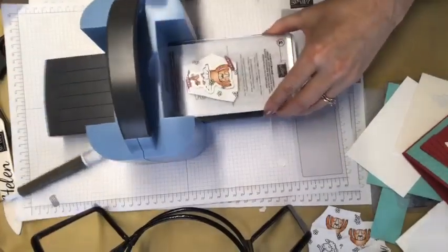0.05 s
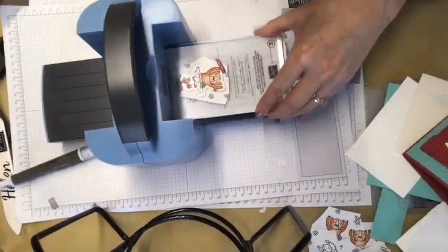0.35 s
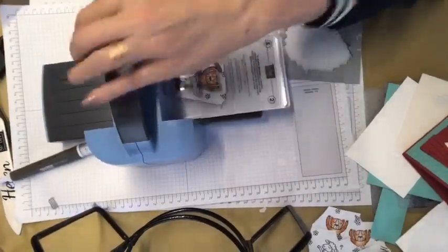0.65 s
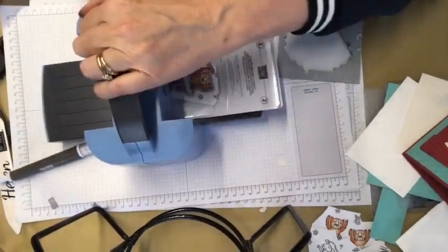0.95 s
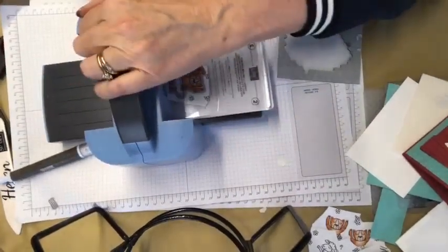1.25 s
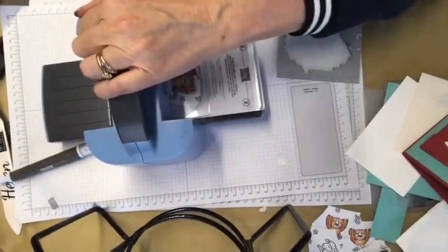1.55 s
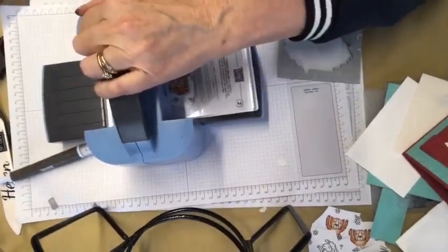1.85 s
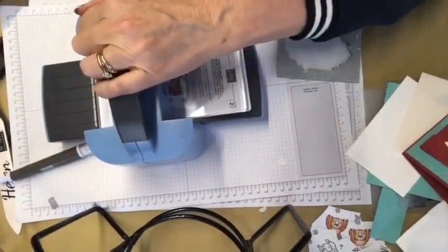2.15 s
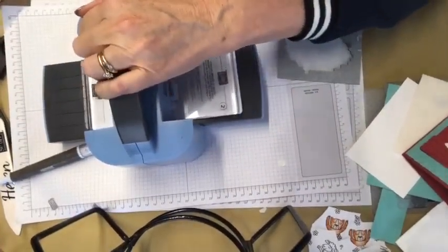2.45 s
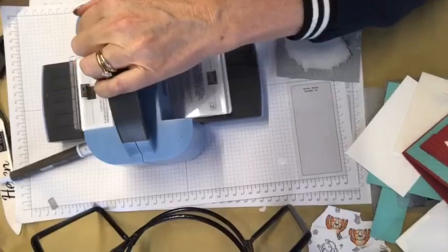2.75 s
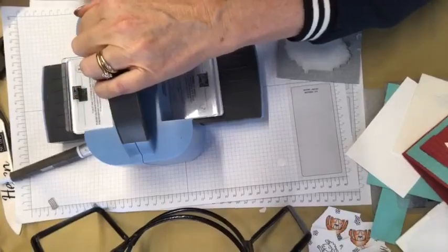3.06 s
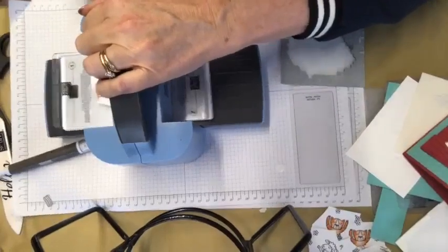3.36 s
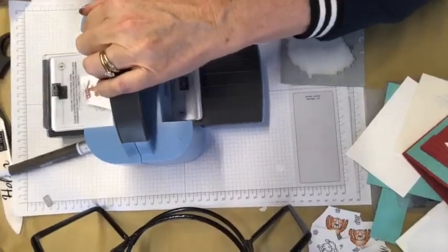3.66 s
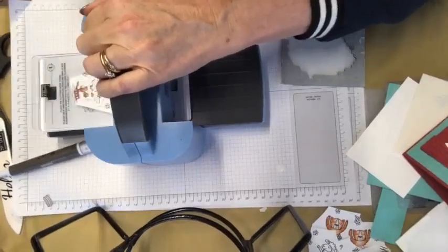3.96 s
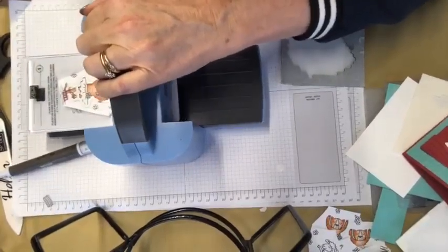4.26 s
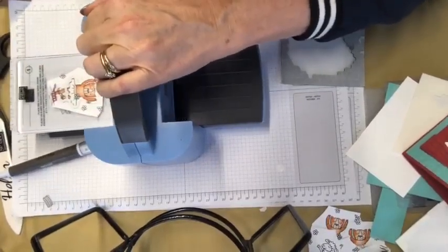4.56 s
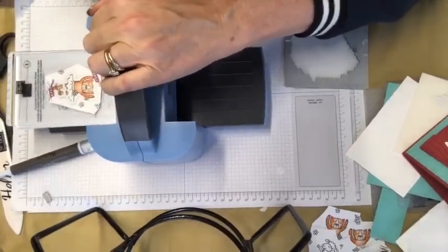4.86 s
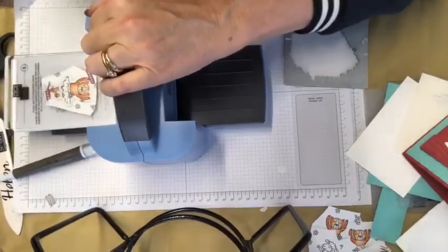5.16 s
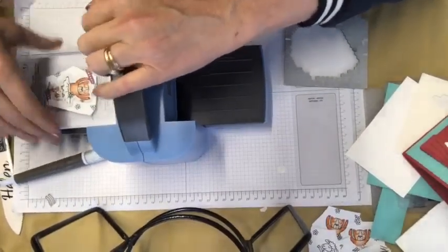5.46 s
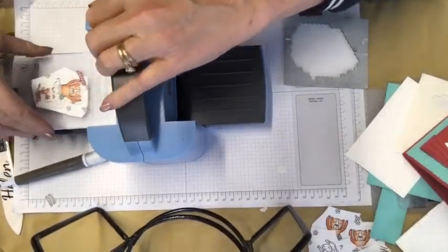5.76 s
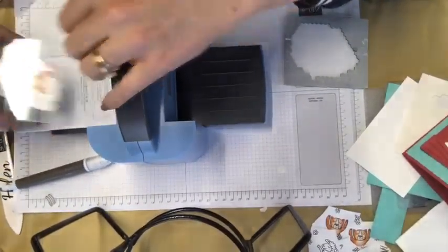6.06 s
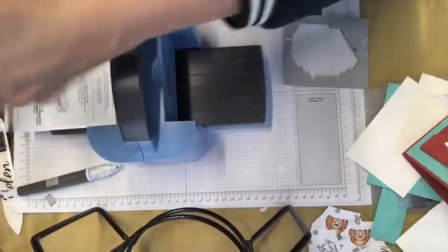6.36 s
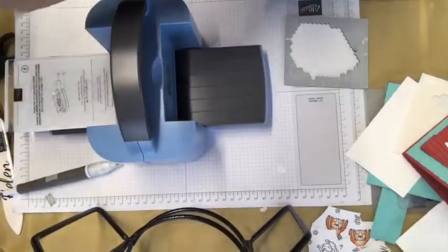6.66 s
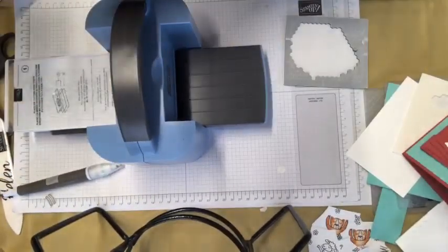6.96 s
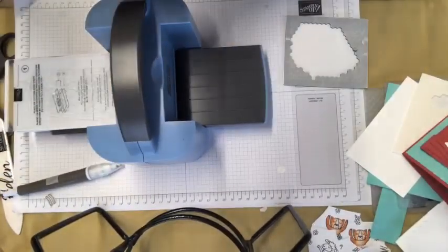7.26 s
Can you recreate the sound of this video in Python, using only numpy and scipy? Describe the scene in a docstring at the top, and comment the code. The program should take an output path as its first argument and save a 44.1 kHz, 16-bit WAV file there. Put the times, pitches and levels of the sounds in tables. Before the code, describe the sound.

A hand-cranked die-cutting machine grinds and ticks as plastic plates pass through its rollers, with a thump and a few sharp clacks.

```python
"""Acrylic plates crack and snap through the rollers of a hand-cranked die-cutting machine.
Pushed in, they crack under pressure and clatter free; the top plate lifts off with a clack.
Each contact is a noise crack plus ringing modes, and the heaviest make the craft table boom.
Play in the crank ticks; stick-slip in the rollers grinds and rumbles with the hand's effort.
Plates creak and hands brush over them, heard from close above in a small room."""
import sys
import numpy as np
from scipy import signal
from scipy.fft import rfft, irfft, next_fast_len
from scipy.io import wavfile

SR = 44100
rng = np.random.default_rng(int(sys.argv[2]) if len(sys.argv) > 2 else 0)


def generate_wav(signal):
    """Clip the signal to [-1, 1] and save it as 16-bit WAV at the path in sys.argv[1]."""
    frames = np.transpose(np.atleast_2d(signal))
    scaled = np.clip(frames, -1, 1) * 32767
    pcm = np.round(scaled).astype(np.int16)
    wavfile.write(sys.argv[1], SR, pcm)


N = 322150
TIME = np.arange(N) / SR
CONTACT_TIME = TIME[:SR // 7]

# start_s, level_db, weight_db, hardness_db, mode_hz, second_hz, mode_db, ring_ratio, attack_s, spread_db
PLATE_CLACKS = [(0.364, -48, -0.5, -8, 660, 1090, 5, 0.19, 0.00034, -15),
                (0.372, -57.5, -9, 7, 7330, 3750, -2, 0.21, 0.00071, -5),
                (0.376, -48, -15, -2, 1778, 2150, -3, 1.3, 0.0043, -3),
                (0.3965, -40.5, -25, -5, 1593, 1280, 13, 0.7, 0.0018, -5),
                (0.401, -53, -19.5, 4, 4700, 1297, 19, 1.6, 0.0015, -8),
                (0.44, -50.5, 8.5, -3, 350, 243, 8, 0.53, 0.0018, -2),
                (0.461, -53.5, 6, -8, 466, 690, -14, 1.3, 0.0017, -7),
                (0.48, -56.5, 6, -11, 1360, 1640, 15, 0.53, 0.00082, -6),
                (3.342, -31, -9.5, 4, 1267, 2090, 2, 0.29, 0.0043, -32),
                (3.346, -45, 3, -4.5, 648, 190, 5.5, 0.8, 0.0015, -29),
                (3.349, -46.5, -13, 4, 2670, 3180, 11.5, 1.9, 0.0017, -23),
                (3.388, -62, -4.5, -1.5, 1670, 1240, 4.5, 0.4, 0.001, -18.5),
                (3.403, -61.5, 16.5, 2, 630, 2550, 0, 0.51, 0.0014, -22),
                (5.0795, -32.5, -11.5, 0, 1490, 1050, 0.5, 0.38, 0.0027, -9.5),
                (5.083, -37, 4, -6, 642, 680, 18, 1.4, 0.0025, -6),
                (5.1005, -47, -10.5, 9, 4400, 3000, -5.5, 0.4, 0.0007, -7),
                (5.1015, -35.5, -26.5, -7.5, 1867, 1044, 19.5, 1.5, 0.0011, -5),
                (5.106, -45, -22, -1.5, 2870, 2330, 10, 0.66, .001, -4),
                (5.131, -46.5, 2, 3, 2015, 4020, 4, 0.62, 0.0031, -1),
                (5.138, -61, 12, -14, 1070, 450, 10, 0.47, 0.0017, -6),
                (5.165, -63, -19, 14, 5200, 2270, -16, 0.5, 0.0013, -16),
                (5.1698, -40, 2, 2.5, 504, 4500, 0, 0.41, 0.00035, -33),
                (5.177, -51.5, 14, -1, 643, 1050, 10, 0.37, 0.0018, -20),
                (5.211, -51, 2.5, 6, 4540, 3950, 8, 0.71, 0.0015, -34),
                (6.0054, -54, -10, 12.5, 5720, 3750, -5.5, 0.3, 0.00067, -44),
                (6.008, -46, -4, 4, 1460, 1130, 1, 0.38, 0.0016, -45),
                (6.014, -48, -3, 1, 315.4, 324, 30, 1.26, 0.0026, -41)]
CLACK_COLOUR_DB = [-7, 1.5, 1.5, -2.5, -13]   # per register


def plate_clacks(registers):
    """Plates knock on the bed and snap as an edge gives way. Returns the sound and its stereo send."""
    out, scattered = np.zeros((2, N))
    for start_s, db, weight_db, hardness_db, *favoured, ring_ratio, attack_s, spread_db in PLATE_CLACKS:
        levels_db = db + register_levels(CLACK_COLOUR_DB, weight_db, hardness_db)
        clack = contact(registers, levels_db, favoured, ring_ratio, attack_s,
                        mode_t60_s=0.042, crack_t60_s=0.072, crack_db=-0.5, uneven_db=6.5)
        add(out, start_s, clack)
        add(scattered, start_s, from_db(spread_db) * clack)
    return out, scattered


# housing and plates: pitch_hz, level_db, t60_s
BODY_MODES = [(199, -17, 0.1), (275, -15, 0.057), (507, -6.5, 0.041), (616.5, 11, 0.047), (914, -8, 0.051),
              (1040, -13, 0.013), (1280, -3, 0.059), (1670, 1, 0.036), (1533, 4.5, 0.037),
              (1780, -6.5, 0.068), (2140, -6.5, 0.083), (2465, -16, 0.097), (2670, -15.5, 0.081),
              (3463, -8, 0.029), (3850, -3.5, 0.029), (4260, 2, 0.018), (5300, -12, 0.0094),
              (6700, -10.5, 0.016)]
# hard plastic: freq_hz, density_db
CRACK_SPECTRUM = [(100, -4), (190, -4), (350, -21.5), (480, 7.5), (620, 8.5), (780, 3.5), (1300, 3),
                  (2100, -0.5), (3400, -6.5), (5200, -10.5), (7600, -12), (9500, -19), (12300, -16.5),
                  (15000, -30.5)]
REGISTER_EDGES_HZ = [100, 400, 1000, 2800, 6500, 15000]   # bass, body, mid, edge, top
REGISTER_ATTACK_RATIO = [1.2, 1.3, 1, 0.62, 0.98]
REGISTER_T60_S = [1.9, 1.5, 0.8, 0.29, 0.08]


def contact(registers, levels_db, favoured, ring_ratio, attack_s,
            mode_t60_s, crack_t60_s, crack_db, uneven_db):
    """A short crack plus the body's modes; the spot struck favours two modes and colours the registers."""
    t = CONTACT_TIME
    mode_hz, second_hz, mode_db = favoured
    hz, db, t60_s = np.transpose(BODY_MODES)[:, :, None]
    detune, strength, polarity = rng.standard_normal((3, len(BODY_MODES), 1))
    shifted_hz = hz * (1 + 0.0068 * detune)   # the plates move between blows
    modes = np.sign(polarity) * from_db(db + uneven_db * strength) * np.sin(2 * np.pi * shifted_hz * t)
    ring = rms_one(np.sum(modes * decay(t, t60_s * ring_ratio), axis=0))
    strongest = blurred_mode(mode_hz, mode_t60_s * ring_ratio)
    second = from_db(-5.5) * blurred_mode(second_hz, mode_t60_s * ring_ratio)
    crack = rms_one(noise(CRACK_SPECTRUM, len(t)) * decay(t, crack_t60_s * ring_ratio))
    sound = ring + from_db(mode_db) * (strongest + second) + from_db(crack_db) * crack
    out = 0
    for sos, level_db, ratio, damping_s in zip(registers, levels_db, REGISTER_ATTACK_RATIO, REGISTER_T60_S):
        onset = 1 - np.exp(-(t / (attack_s * ratio)) ** 2)
        band = signal.sosfilt(sos, sound * onset * decay(t, damping_s))
        out = out + from_db(level_db) * rms_one(band)
    return out


WEIGHT_DB_PER_DB = [0.82, 0.53, 0, 0.24, 0.042]
HARDNESS_DB_PER_DB = [-0.14, -0.35, 0, 1.067, 1.526]


def register_levels(colour_db, weight_db, hardness_db):
    """A heavy contact lifts the low registers, a hard one the high."""
    heavy_db = weight_db * np.array(WEIGHT_DB_PER_DB)
    hard_db = hardness_db * np.array(HARDNESS_DB_PER_DB)
    return np.array(colour_db) + heavy_db + hard_db


def blurred_mode(hz, base_t60_s):
    """Contact chatter jostles a mode's phase; high modes blur more and die sooner."""
    t, height = CONTACT_TIME, np.sqrt(hz / 1500)
    width_hz = 0.015 * height * hz
    jostle = np.cumsum(rng.standard_normal(len(t))) * np.sqrt(2 * np.pi * width_hz / SR)
    return rms_one(np.sin(2 * np.pi * hz * t + jostle) * decay(t, base_t60_s / height))


# start_s, hold_s, level_db
PLATE_CRUNCHES = [(0.431, 0.016, -52), (3.336, 0.097, -50.5), (5.086, 0.036, -43.5)]
# freq_hz, density_db
CRUNCH_SPECTRUM = [(30, -15), (80, -1), (140, 2.5), (300, -8), (650, 1.5), (1000, -8), (2600, 2),
                   (4500, -3), (7000, -8.5), (9500, -20.5), (13000, -18)]


def plate_crunches():
    """Pressed plates grate on after giving way: a rough burst that holds, then dies."""
    out = np.zeros(N)
    grating = noise(CRUNCH_SPECTRUM, N) * from_db(5.6 * drift(150))
    for start_s, hold_s, db in PLATE_CRUNCHES:
        envelope = decay(np.maximum(TIME[:SR // 2] - hold_s, 0), t60_s=0.22)
        add(out, start_s, from_db(db) * envelope * grating[int(start_s * SR):][:len(envelope)])
    return out


# start_s, level_db
TABLE_THUMPS = [(0.442, -23), (3.343, -39.5), (5.174, -42)]
# pitch_hz, level_db, t60_s
TABLE_MODES = [(66.96, -18.5, 0.65), (94, -14.5, 0.74), (112, -6.5, 0.35), (136, -10, 0.34),
               (222, -4, 0.17), (325, -13, 0.27)]


def table_thumps():
    """The machine lands on rubber feet; the table's boom starts sharp and sinks as it settles."""
    t, out = TIME[:SR], np.zeros(N)
    sharp_ratio, settle_s = 0.13, 0.056
    warped_s = t + sharp_ratio * settle_s * (1 - np.exp(-t / settle_s))
    modes = sum(from_db(db) * np.sin(2 * np.pi * hz * warped_s) * decay(t, t60_s)
                for hz, db, t60_s in TABLE_MODES)
    onset = 1 - np.exp(-t / 0.0035)
    boom = signal.sosfilt(signal.butter(2, 70, "high", fs=SR, output="sos"), modes * onset)
    for start_s, db in TABLE_THUMPS:
        add(out, start_s, from_db(db) * boom)
    return out


# start_s, level_db, weight_db, hardness_db, mode_hz, second_hz, mode_db
CRANK_TICKS = [(0.159, -54.5, -1.5, -5, 2080, 1610, -5), (0.285, -61.5, 13, -4.5, 592, 1330, 6),
               (0.332, -54.5, 0, 5.5, 2340, 3720, -3.5), (0.592, -65.5, -5, -1.5, 1550, 1980, -3),
               (0.697, -64.5, 1, -3.5, 1280, 2410, -1), (0.804, -70, -5, -22, 1326, 2230, 20),
               (0.994, -56, 3, 2.5, 1590, 3200, -5), (1.045, -58, -4, -8, 1844, 1400, -2),
               (1.254, -57, 6, -7, 1400, 660, -4), (1.478, -57.5, -11, -2, 1550, 2140, -15),
               (1.552, -56, -8, 1, 1490, 2160, -1), (1.591, -54.5, 9.5, 1, 2010, 2520, -6),
               (2.117, -58, 8, -1.5, 2210, 485, -1), (2.246, -62.5, 9, 8.5, 5080, 4180, -1),
               (2.378, -71, 19.5, -4.5, 1850, 1300, -3), (2.447, -55.5, 9, -4, 720, 1640, -3),
               (2.49, -63.5, 9, 1.5, 1010, 1840, -4), (2.531, -57, 2, 5.5, 1303, 3390, 5),
               (2.645, -69.5, 8, 8.5, 3070, 3860, 7), (2.954, -51, -5, -2.5, 1615, 2120, -3.5),
               (3.249, -65.5, 3.5, 9, 1360, 4370, -2), (3.605, -63, 2, -9, 500, 1650, 1),
               (3.672, -58, -7, -7, 1323, 3110, 0), (3.703, -54.5, -8, -6.5, 1306, 2130, 3),
               (3.757, -65.5, -11, -18, 1320, 1910, -7), (3.93, -93, -11, 29, 1410, 4540, -15),
               (4.075, -63, -15, -14, 1320, 2260, 1), (4.18, -53.5, -0.5, -1, 1830, 1505, -3.5),
               (4.304, -59, -12, -13, 1530, 1320, 19), (4.377, -55.5, -9, -4, 1230, 676, -4),
               (4.418, -61.5, -6, 8, 1960, 3930, -1), (4.515, -53.5, 4.5, -3, 695, 1730, -3),
               (4.588, -55, 15.5, -3.5, 617, 287, 6.5), (4.629, -48, 1, -6, 1477, 2440, 3.5),
               (4.705, -61, 1.5, -19, 740, 1340, 0), (4.74, -63, -15, 21, 4780, 2460, 6.5),
               (4.845, -60.5, -6.5, -9.5, 1410, 1210, 4), (4.869, -55, 0, 1.5, 1320, 3270, 0),
               (4.914, -67, 2, 12, 3700, 5900, 1.5), (4.989, -52.5, -10, -3.5, 1280, 1940, 3),
               (5.278, -63, -2, -1, 1380, 895, 9), (5.333, -57, 5, 7.5, 4730, 1550, 3.5),
               (5.403, -59.5, -1, -4, 1550, 1900, 5), (5.48, -58, 1.5, 2, 1527, 5200, -2),
               (5.593, -75, -11, 8.5, 1560, 4400, -4), (5.693, -71, 2, -3, 1980, 4010, -16),
               (5.753, -67, -4, -13, 1430, 970, 1), (5.783, -72, 14, 5.5, 3990, 1280, -1),
               (5.796, -65, 14, 4, 4100, 1152, -4), (6.058, -62, 12, -9, 1150, 1457, 7),
               (6.142, -73.5, 13, 6.5, 2220, 4940, -10), (6.217, -64.5, 14, 5, 3360, 1520, -4),
               (6.286, -71.5, -8, 0, 1736, 1197, 9), (6.733, -72, -30, 20.5, 6860, 3440, -38),
               (7.14, -90.5, -8, 23, 2690, 6900, -9)]
TICK_COLOUR_DB = [-12, -3, 1.5, -7.5, -24]   # per register


def crank_ticks(registers, effort_db):
    """Play in the crank and gears is taken up in small, dry knocks; fingers tap the plates."""
    out = np.zeros(N)
    for start_s, db, weight_db, hardness_db, *favoured in list(CRANK_TICKS) + rattles(effort_db):
        levels_db = db + register_levels(TICK_COLOUR_DB, weight_db, hardness_db)
        ring_ratio = 0.9 * from_db(rng.standard_normal())
        tick = contact(registers, levels_db, favoured, ring_ratio, attack_s=0.0019,
                       mode_t60_s=0.028, crack_t60_s=0.038, crack_db=-1, uneven_db=4)
        add(out, start_s, tick)
    return out


def rattles(effort_db, count=12):
    """Rows of faint random ticks, likelier and louder under effort."""
    chance = np.cumsum(from_db(effort_db))
    at = np.searchsorted(chance, rng.random(count) * chance[-1])
    mode_hz, second_hz = rng.uniform(1110, 2400, (2, count))
    offset_db, weight_db, hardness_db, mode_db = 5.5 * rng.standard_normal((4, count))
    level_db = effort_db[at] - 14 + offset_db
    return list(zip(at / SR, level_db, weight_db, hardness_db - 2, mode_hz, second_hz, mode_db))


# on plates or crank: middle_s, length_s, effort_db, weight_db
HAND_PUSHES = [(0.022, 0.14, -61.5, -5), (0.48, .2, -59, 6), (1.082, 0.25, -61.5, 4.5),
               (1.257, .3, -59.5, 8.5), (1.603, .26, -60, 6.5), (2.1, 0.28, -65, 4), (2.541, 0.4, -62, 6),
               (2.918, 0.38, -64, 6.5), (3.296, .36, -59, 1), (3.687, .2, -56.5, 2), (3.972, 0.2, -58, 6.5),
               (4.34, 0.3, -60.5, 8), (4.623, 0.35, -57.5, 3.5), (4.871, 0.16, -58.5, -1.5),
               (5.296, 0.45, -59.5, -3.5), (5.475, .2, -65, 8), (5.775, 0.1, -67, 3.5),
               (6.161, .26, -64.5, -1), (6.71, .3, -74, -7.5)]
# time_s, effort_db
PLATE_DRAG = [(0, -69.5), (0.75, -75), (0.95, -67.5), (1.35, -65.5), (1.85, -70), (2.35, -68.5),
              (2.7, -63.5), (3.1, -71.5), (3.55, -62), (4.15, -64.5), (4.75, -64), (5.05, -68), (5.3, -65),
              (5.6, -71), (5.9, -77), (6.4, -85.5), (7.3, -84.5)]


def hand_effort():
    """The hand's drive and its lean on the machine, in dB: pushes swell and fade over a steady drag."""
    drag = from_db(np.interp(TIME, *np.transpose(PLATE_DRAG))) ** 2
    drive, leaning = drag, drag
    for middle_s, length_s, db, weight_db in HAND_PUSHES:
        swell = np.cos(np.pi * np.clip((TIME - middle_s) / length_s, -0.5, 0.5)) ** 2
        drive = drive + swell * from_db(db) ** 2
        leaning = leaning + swell * from_db(db + weight_db) ** 2
    return 10 * np.log10(drive), 10 * np.log10(leaning)


# pitch_hz, width_hz, level_db
ROLLER_RESONANCES = [(106, 79, -5), (139, 21, 5.5), (182, 74, -4), (313, 93, -3), (463, 670, -7.5)]
FRAME_RESONANCES = [(643, 63, 5.5), (699, 55, 5), (830, 210, -6)]
PLATE_RESONANCES = [(1050, 67, -1), (1348, 85, 2.5), (1600, 90, 0.5), (1990, 310, -4.5), (2560, 82, -7.5)]
BED_RASP_RESONANCES = [(3280, 700, 1.5), (4450, 1400, -0.5), (6535, 2200, -6.5)]
# sliding faces: freq_hz, density_db
HISS_SPECTRUM = [(1470, -26.5), (2500, 0.5), (4110, -4), (4920, -5), (5810, -7.5), (7810, -10),
                 (9280, -15.5), (12500, -19), (13300, -19.5), (14000, -52)]
USUAL_EFFORT_DB = -60


def rollers(effort_db, leaning_db):
    """Slips shake rollers, frame and plates while sliding faces hiss and rasp; all grow with effort."""
    low, middle, high = band_filters([80, 520, 950, 4200], order=2)
    rumble = rms_one(signal.sosfilt(low, resonate(slips(per_s=810, spread_db=2.5), ROLLER_RESONANCES)))
    frame = rms_one(signal.sosfilt(middle, resonate(slips(per_s=320, spread_db=6), FRAME_RESONANCES)))
    grind = rms_one(signal.sosfilt(high, resonate(slips(per_s=520, spread_db=-0.5), PLATE_RESONANCES)))
    hiss = noise(HISS_SPECTRUM, N) * from_db(1.3 * drift(40))
    rasp = resonate(slips(per_s=130, spread_db=3.5), BED_RASP_RESONANCES)
    waver_db = 2.5 * drift(9)
    layers = [(rumble, -59, 0.52, leaning_db),
              (plate_travel(frame), -63.5, 0.78, leaning_db),
              (plate_travel(grind), -60.5, 0.86, effort_db),
              (roller_grit(), -64.5, 0.98, effort_db),
              (hiss, -68, 0.38, effort_db),
              (rasp, -72.5, 0.8, effort_db)]
    return sum(sound * from_db(usual_db + db_per_db * (drive_db + waver_db - USUAL_EFFORT_DB))
               for sound, usual_db, db_per_db, drive_db in layers)


# pitch_hz
GRIT_SPOTS = [634, 670, 720, 1290, 1410, 1580, 1870, 2240, 3070]


def roller_grit(q=20, db_per_octave=-2):
    """Sparse catches of the rollers, each ringing one spot of the plates or frame."""
    out = 0
    for hz in GRIT_SPOTS:
        catches = resonate(slips(per_s=9, spread_db=2.3), [(hz, hz / q, 0)])
        out = out + from_db(db_per_octave * np.log2(hz)) * catches
    return rms_one(out)


def slips(per_s, spread_db):
    """Tiny stick-slip jolts of uneven size, in clumps."""
    sizes = from_db(spread_db * np.minimum(rng.exponential(1, N), 4))
    signs = rng.choice([-1, 1], N)
    slipping = rng.random(N) < per_s * from_db(3 * drift(25)) / SR
    return sizes * signs * slipping + 1e-18


def plate_travel(x):
    """Resonances wander a little as the plates pass through."""
    position = np.cumsum(1 + 0.015 * drift(3))
    return np.interp(position % N, np.arange(N), x)


# start_s, end_s, level_db, pitch_hz
PLATE_CREAKS = [(1.071, 1.1, -52.5, 400), (2.007, 2.078, -53, 668), (2.493, 2.6, -60, 690),
                (2.832, 2.956, -57.5, 1370), (2.822, 2.93, -61.5, 700), (3.171, 3.22, -54, 704),
                (3.379, 3.416, -44.5, 640), (3.569, 3.604, -51, 623), (3.659, 3.69, -58, 3040)]


def plate_creaks(q=20):
    """Under high pressure the plates stick and slip in quick runs that sound one resonance."""
    out, jolts = np.zeros(N), slips(per_s=280, spread_db=-2.5)
    for start_s, end_s, db, hz in PLATE_CREAKS:
        first, size = int(start_s * SR), int((end_s - start_s) * SR)
        creak = resonate(jolts[first:first + size], [(hz, hz / q, 0)])
        add(out, start_s, from_db(db) * creak * signal.windows.tukey(size, 0.5))
    return out


# start_s, end_s, level_db, centre_hz
BRUSH_STROKES = [(-0.04, 0.092, -51.5, 3630), (0.362, 0.422, -39.5, 2280), (0.441, 0.483, -48, 3000),
                 (0.699, 0.74, -58.5, 1820), (0.874, 0.913, -60, 3030), (1.078, 1.59, -62.5, 3360),
                 (4.901, 5.003, -58.5, 4440), (5.57, 5.636, -67.5, 4500), (5.668, 5.707, -68, 4020),
                 (6.721, 6.891, -66, 6720), (6.975, 7.106, -64, 7560)]


def brushes():
    """Hands, sleeve and plates stroke plastic and paper: grainy swishes that swell and fade."""
    out, grain = np.zeros(N), from_db(2.3 * drift(60))
    for start_s, end_s, db, hz in BRUSH_STROKES:
        size = int((end_s - start_s) * SR)
        spectrum = [(hz / 4, -18), (hz * 0.5, -2), (hz * 1.1, 0), (hz * 2.6, -16), (hz * 5, -32)]
        swish = noise(spectrum, size) * signal.windows.tukey(size, 0.7)
        before_zero = max(round(-start_s * SR), 0)
        add(out, start_s, from_db(db) * swish[before_zero:])
    return out * grain


# freq_hz, t60_s
ROOM_DECAY = [(100, 0.37), (600, 0.37), (2500, 0.2), (7000, 0.37), (13000, 0.076)]


def room(x, wet_db, build_s):
    """A small furnished room: diffuse echoes build quickly and die soonest in the top treble."""
    t, tail = TIME[:SR // 2], 0
    edges_hz = 28 * 2 ** np.arange(0, 9.6, 0.5)
    white = rng.standard_normal((2, len(t)))
    for k, sos in enumerate(band_filters(edges_hz, order=2)):
        tail = tail + signal.sosfilt(sos, white[k % 2]) * decay(t, at_hz(ROOM_DECAY, edges_hz[k]))
    tail = tail * (1 - np.exp(-(t / build_s) ** 2))
    return x + from_db(wet_db) * signal.fftconvolve(x, tail / np.linalg.norm(tail))[:N]


# freq_hz, density_db
ROOM_SPECTRUM = [(20, -32), (40, -16), (62, -3.5), (100, -1), (128, -17.5), (148, 10.5), (175, -18.5),
                 (240, -8), (350, -4.5), (430, -24), (600, -21.5), (1000, -18.5), (1350, -29.5),
                 (2000, -32), (3000, -44.5), (6000, -47.5)]


def room_tone():
    """Steady low noise and a faint hiss."""
    return from_db(-66.5) * noise(ROOM_SPECTRUM, N) + from_db(-87.5) * noise(HISS_SPECTRUM, N)


def stereo(centre, scattered):
    """Only the treble of the scattered sound spreads sideways."""
    treble = signal.sosfilt(signal.cheby1(8, 0.5, [4300, 12500], "band", fs=SR, output="sos"), scattered)
    t = TIME[:SR // 20]
    scatter = rng.standard_normal(len(t)) * decay(t, t60_s=0.03)
    side = signal.fftconvolve(treble, scatter / np.linalg.norm(scatter))[:N]
    return np.array([centre + side, centre - side])


def resonate(x, resonances):
    """Parallel resonances of alternating sign, rms 1."""
    out = 0
    for k, (hz, width_hz, db) in enumerate(resonances):
        r = np.exp(-np.pi * width_hz / SR)
        poles = [1, -2 * r * np.cos(2 * np.pi * hz / SR), r * r]
        out = out + (-1) ** k * from_db(db) * signal.lfilter([1 - r * r, 0, r * r - 1], poles, x)
    return rms_one(out)


def noise(spectrum, size):
    """Coloured noise, rms 1."""
    padded = next_fast_len(size)
    gain = from_db(at_hz(spectrum, np.fft.rfftfreq(padded, 1 / SR)))
    return rms_one(irfft(rfft(rng.standard_normal(padded)) * gain, padded)[:size])


def drift(rate_hz):
    """Slow random wander, rms 1."""
    hop, warmup = 40, 2000
    r = np.exp(-2 * np.pi * hop * rate_hz / SR)
    white = rng.standard_normal(N // hop + warmup + 2)
    slow = signal.lfilter([1], [1, -2 * r, r * r], white)[warmup:]
    return np.interp(np.arange(N) / hop, np.arange(len(slow)), rms_one(slow))


def band_filters(edges_hz, order):
    """One band-pass between each pair of edges."""
    return [signal.butter(order, pair, "band", fs=SR, output="sos")
            for pair in zip(edges_hz, edges_hz[1:])]


def at_hz(points, hz):
    """Read a table along a log-frequency axis."""
    freqs, values = np.transpose(points)
    return np.interp(np.log(np.maximum(hz, 1)), np.log(freqs), values)


def decay(t, t60_s):
    """Falls 60 dB in t60_s."""
    return np.exp(-np.log(1000) * t / t60_s)


def from_db(db):
    """Decibels to gain."""
    return 10 ** (np.asarray(db) / 20)


def rms_one(x):
    """Scale to rms 1."""
    return x / np.sqrt(np.mean(x ** 2) + 1e-20)


def add(track, start_s, sound):
    """Mix a sound in from start_s."""
    at = max(round(start_s * SR), 0)
    track[at:at + len(sound)] += sound[:N - at]


def scene():
    """Machine, table and room."""
    registers = band_filters(REGISTER_EDGES_HZ, order=3)
    effort_db, leaning_db = hand_effort()
    clacks, scattered = plate_clacks(registers)
    ticks = crank_ticks(registers, effort_db)
    crunches = plate_crunches()
    friction = rollers(effort_db, leaning_db) + brushes() + plate_creaks()
    air = room_tone()
    scattered = scattered + from_db(-8.5) * (friction + air) + from_db(-19.5) * (ticks + crunches)
    machine = room(clacks + ticks + crunches + friction, wet_db=-15, build_s=0.0015)
    return stereo(machine + table_thumps() + air, scattered)


def record(dry):
    """Steep low-pass at 13.1 kHz."""
    return signal.sosfilt(signal.ellip(10, 0.2, 80, 13100, fs=SR, output="sos"), dry)


dry = scene()
out = record(dry)
generate_wav(out)
```